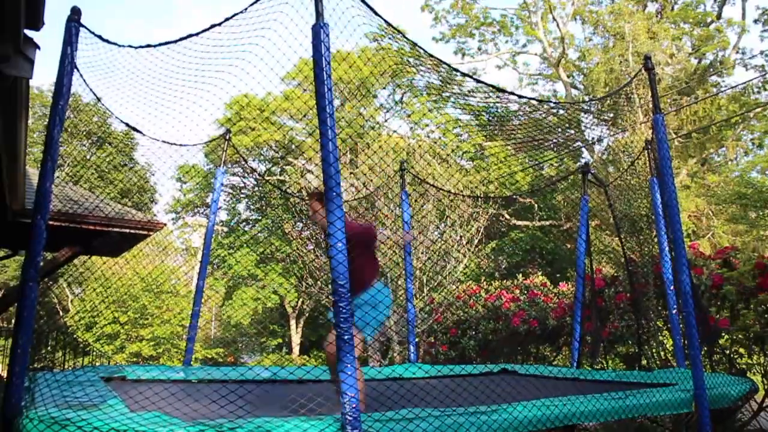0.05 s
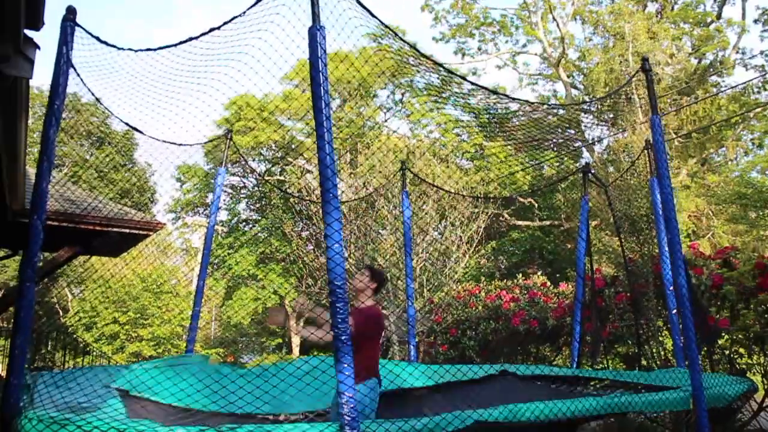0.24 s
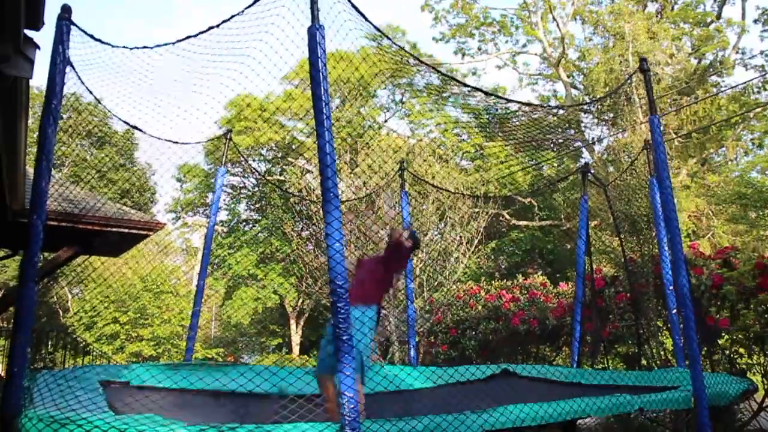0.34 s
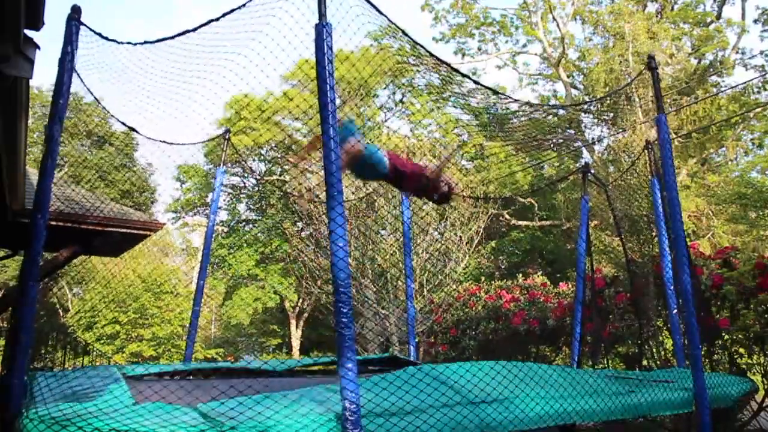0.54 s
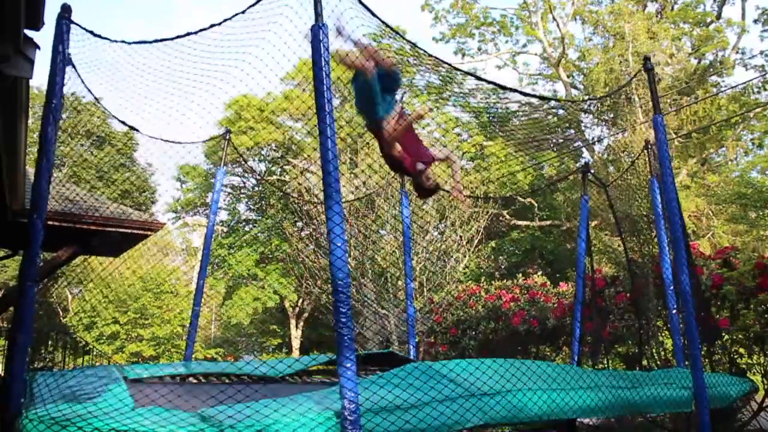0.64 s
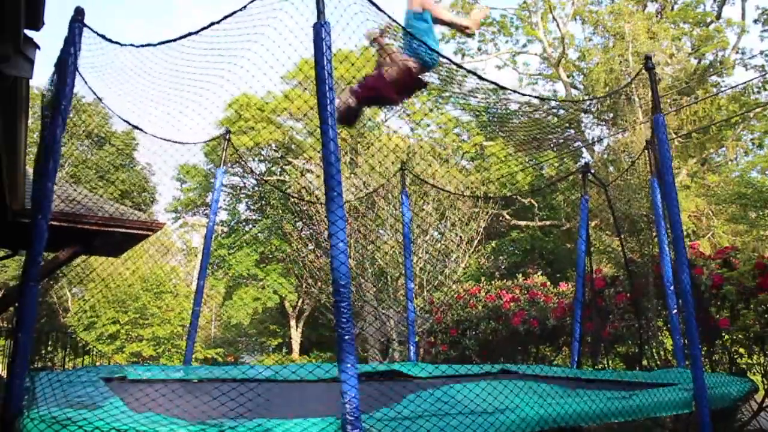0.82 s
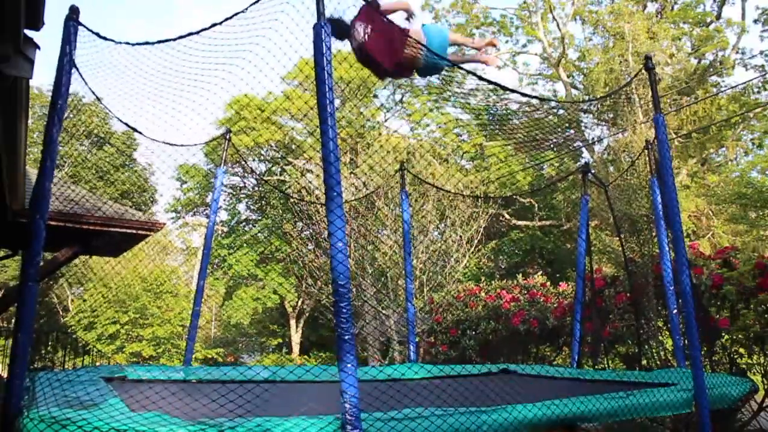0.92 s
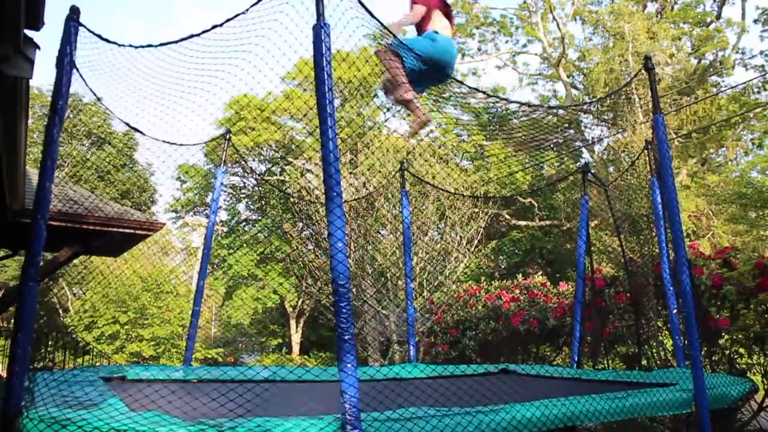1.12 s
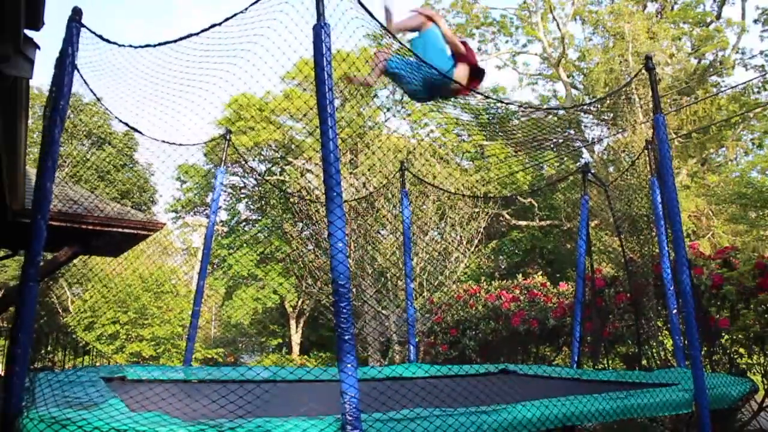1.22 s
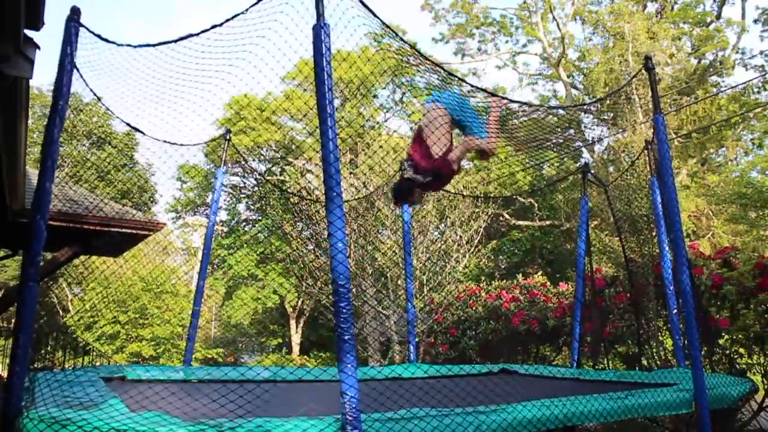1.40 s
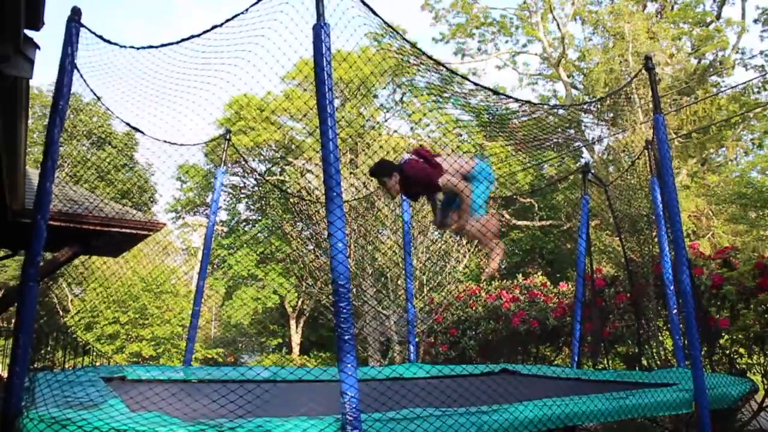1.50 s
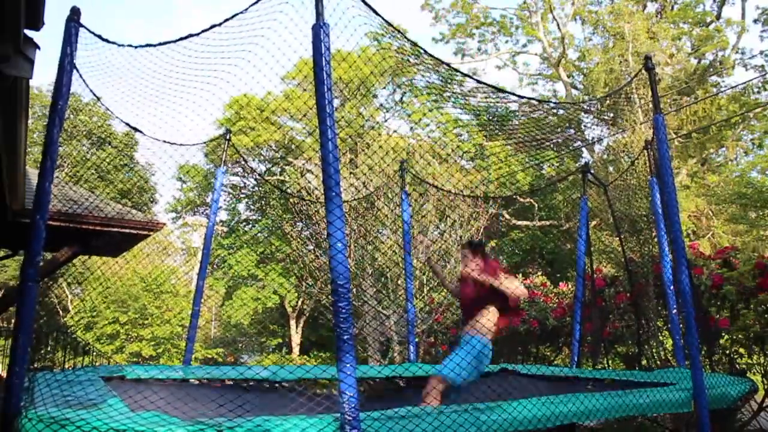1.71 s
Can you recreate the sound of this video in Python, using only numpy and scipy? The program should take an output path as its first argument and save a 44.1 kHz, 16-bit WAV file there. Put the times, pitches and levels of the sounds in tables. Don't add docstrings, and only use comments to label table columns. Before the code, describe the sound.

Trampoline bounce heard from a few metres in a quiet garden: feet land softly, springs jangle, pads flap hard in clustered thumps, looser knocks follow, then near silence with faint hiss before another soft landing.

```python
import sys
import numpy as np
from scipy import signal
from scipy.fft import rfft, irfft, next_fast_len
from scipy.io import wavfile
from scipy.ndimage import uniform_filter1d

SR = 44100
rng = np.random.default_rng(int(sys.argv[2]) if len(sys.argv) > 2 else 0)


def boost(x):
    u = np.asarray(x, float) / 20
    return 10 ** u


def wav_record(signal):
    frames = np.transpose(np.atleast_2d(signal))
    bounded = np.clip(frames, -1, 1)
    quanta = np.round(bounded * 32767).astype(np.int16)
    wavfile.write(sys.argv[1], SR, quanta)


N = 77175


def colour(x, points):
    size = next_fast_len(N + 4096)
    hz = np.arange(2049) * SR / 4096 + 1e-3
    p = np.array(points, float)
    log_gain = np.interp(np.log(hz), np.log(p[:, 0]), p[:, 1]) * np.log(10) / 20
    cepstrum = irfft(log_gain)
    cepstrum[1:2048] *= 2
    cepstrum[2049:] = 0
    response = irfft(np.exp(rfft(cepstrum)))
    return irfft(rfft(x, size) * rfft(response, size), size)[..., :N]


def unit(x):
    return x / np.sqrt(np.mean(x ** 2))


def ring(x, hz, width):
    return signal.lfilter(*signal.iirpeak(hz, hz / width, fs=SR), x)


def resonances(x, table):
    return sum((-1) ** k * boost(db) * ring(x, hz, width) for k, (hz, width, db) in enumerate(table))


def shaken(bursts, per_s, spread_db, body):
    t = np.arange(N) / SR
    power = 0
    for peak_s, db, rise_s, fall_s in bursts:
        away = np.where(t < peak_s, (peak_s - t) / abs(rise_s), (t - peak_s) / abs(fall_s))
        power = power + boost(db - 20 * away) ** 2
    chance, direction, size = rng.random((3, 2, N))
    knocks = (chance < per_s / SR) * np.sign(direction - .5) * boost(-spread_db * np.log(size + .004))
    return body(knocks * np.sqrt(power)) / np.sqrt(np.mean(body(knocks) ** 2))


def struck(modes, contact_s):
    out = np.zeros(N + SR)
    t = np.arange(SR // 2) / SR
    for k, (start_s, hz, db, t60) in enumerate(modes):
        i = int(start_s * SR)
        onset = 1 - np.exp(-t / contact_s)
        out[i:i + len(t)] += (-1) ** k * boost(db - 60 * t / t60) * np.sin(2 * np.pi * hz * t) * onset
    return out[:N] * np.array([[1], [0]])


# peak_s, level_db (rms), rise_s, fall_s
THUDS = [(.135, -52, 0.012, 0.091), (.265, -38, 0.15, 0.3), (.36, -28.5, 0.063, 0.057),
         (.392, -29, 0.04, 0.03), (.457, -26.5, 0.019, 0.064), (.52, -39.5, 0.031, 0.28),
         (.68, -52, 0.067, .1), (.8, -39.5, 0.064, 0.17), (.875, -34.5, 0.043, 0.032),
         (.946, -42, 0.025, 0.044), (1.005, -34.5, 0.13, 0.081), (1.08, -44, 0.029, 0.015),
         (1.74, -35, 0.018, .05)]
# pitch_hz, width_hz, level_db
PAD = [(142.7, 72, -0.5), (200, 69, 0.5), (281.5, 76, -2.5), (400, 224, -4.5), (546, 252, -6.5)]


def pad_thuds():
    return shaken(THUDS, 2500, 2.2, lambda x: resonances(x, PAD))


# start_s, pitch_hz, peak_db, fade_60db_s
KNOCKS = [(.348, 185, -14, 0.07), (0.3788, 143, -13, 0.068), (0.385, 190, -16, 0.04),
          (0.5087, 219, -22, 0.088), (0.8027, 233, -21, 0.03), (0.857, 225, -25.5, 0.08),
          (0.8653, 232.3, -22, 0.076), (0.878, 200, -30, 0.05), (.99, 176, -24, 0.12),
          (1.0015, 176, -22, 0.1), (1.7193, 121, -26, 0.044), (1.732, 128, -29, 0.064)]
# multiple of its pitch, level_db
PAD_MODES = [(1, -0.5), (1.55, -9), (2.3, -8), (3.8, -10), (5.5, -14)]


def pad_knocks():
    modes = []
    for start_s, hz, db, t60 in KNOCKS:
        for multiple, overtone_db in PAD_MODES:
            modes.append((start_s, multiple * hz, db + overtone_db, t60 / np.sqrt(multiple)))
    return struck(modes, contact_s=0.0022)


# peak_s, level_db (rms), rise_s, fall_s
SLAPS = [(.14, -45.5, 0.034, 0.16), (.21, -25.5, 0.0041, 0.086), (.245, -27.5, 0.074, 0.14),
         (.354, -24, 0.033, 0.068), (.385, -20.5, 0.035, 0.099), (.404, -17, 0.028, 0.036),
         (.462, -26, 0.024, 0.11), (.505, -32, 0.11, 0.13), (.7, -33.5, 0.14, 0.16),
         (.803, -35, 0.029, .04), (.87, -36.5, 0.058, 0.072), (.96, -31.5, 0.054, 0.068),
         (1.008, -29, 0.061, 0.05), (1.08, -41.5, 0.099, 0.099), (1.722, -43, 0.0049, .1),
         (1.745, -46, .02, .05)]
# pitch_hz, width_hz, level_db
VINYL = [(827, 154, -1.5), (1030, 156, -1.5), (1298, 183, 0.5), (1564, 357, -1.5), (2043, 1030, -9.5),
         (556, 334, -7.5)]


def vinyl_slaps():
    return shaken(SLAPS, 6000, 2.2, lambda x: resonances(x, VINYL))


# peak_s, level_db (rms), rise_s, fall_s
HEAVES = [
    (.125, -43, 0.024, 0.04),
    (.3, -43, 0.087, 0.072),
    (.41, -40, .1, 0.16),
    (1.0, -48, 0.055, 0.093),
    (1.73, -43, 0.018, .1),
]
# pitch_hz, width_hz, level_db
MAT = [(30, 27, 3), (59, 25, 5), (99, 36, -3.5)]


def mat_heaves():
    return shaken(HEAVES, 2500, 2.2, lambda x: resonances(x, MAT))


# start_s, pitch_hz, peak_db, fade_60db_s
FEET = [(.119, 140, -27, .14), (.121, 307, -29, .14), (.12, 470, -32, .12), (.122, 760, -36, 0.088),
        (1.7195, 190, -30, .05), (.348, 330, -20, .05), (.381, 380, -17, .05), (.866, 480, -33, .05),
        (1.7195, 270, -32, 0.036), (1.731, 287, -37, 0.046), (.858, 155, -29, .08), (.866, 296, -28, 0.037),
        (.801, 164, -30, .06)]


def feet_on_mat():
    return -struck(FEET, contact_s=0.0014)


# peak_s, level_db (rms), rise_s, fall_s
RATTLES = [(.121, -55.5, .004, 0.36), (.198, -41, 0.022, 0.036), (.222, -29.5, 0.018, 0.15),
           (.36, -35.5, 0.089, .08), (.403, -26.5, 0.047, 0.05), (.458, -31.5, 0.034, 0.11),
           (.553, -34, 0.0046, 0.062), (.67, -42.5, 0.099, 0.04), (.705, -39, 0.037, 0.054),
           (.758, -40.5, 0.01, 0.053), (.803, -41.5, 0.015, 0.046), (.872, -40.5, 0.046, 0.067),
           (.95, -43.5, 0.013, 0.09), (1.008, -43, 0.052, 0.063), (1.074, -40.5, 0.015, 0.042),
           (1.12, -59.5, .05, 0.53), (1.292, -54, 0.0058, 0.058), (1.622, -55.5, 0.03, .06),
           (1.722, -50, 0.0065, 0.12)]
# pitch_hz, level_db
COILS = [(1500, -11.5), (2300, -1.5), (3600, 1), (5000, -4.5), (7000, -8.5), (10000, -10), (12000, -17.5),
         (16000, -24)]


def spring_rattles():
    return shaken(RATTLES, 14000, 2.4, lambda x: colour(x, COILS))


# start_s, pitch_hz, width_hz, level_db (rms), fall_s
RINGS = [(.225, 1015, 303, -37, 0.057), (0.214, 3240, 500, -34, 0.023), (.235, 3720, 100, -42, 0.083),
         (.26, 2286, 300, -32.5, 0.052), (0.451, 4820, 300, -40.5, 0.049), (.552, 3960, 304, -50, 0.089),
         (.552, 5280, 400, -42.5, 0.054), (.669, 3700, 200, -40.5, 0.09), (.72, 5000, 300, -44.5, 0.032),
         (.758, 7870, 150, -59, 0.084), (1.08, 5210, 300, -51, 0.039), (1.07, 3800, 300, -54, 0.061),
         (1.289, 3030, 900, -58, 0.054)]


def chattering_parts():
    out = 0
    for start_s, hz, width, db, fall_s in RINGS:
        burst = [(start_s, db, .003, fall_s)]
        out = out + shaken(burst, 14000, 1, lambda x: ring(ring(x, hz, width), hz, width))
    first_blows = [(start_s, hz, db + 3.5, 2 * fall_s) for start_s, hz, _, db, fall_s in RINGS]
    return out + struck(first_blows, contact_s=0.0022)


# start_s, pitch_hz, peak_db, fade_60db_s
PINGS = [(.394, 1060, -10.5, 0.096), (.399, 1090, -9, 0.039), (.399, 550, -12, .08), (.399, 320, -14, .07),
         (.403, 1357, -17, 0.047), (.407, 720, -12, .07), (.414, 1060, -17, 0.087), (.382, 1800, -21, .05),
         (0.29, 1200, -25, 0.047), (.212, 1100, -23.5, 0.1), (.23, 930, -28.5, .15), (.268, 360, -30, 0.11),
         (.455, 5650, -39, .1), (0.51, 2557, -33, .09), (.462, 1600, -27, 0.07), (.465, 3688, -35.5, .12),
         (0.42, 2900, -36, 0.28), (.485, 2200, -37, 0.1), (.556, 3935, -35, 0.13), (.553, 3661, -41, 0.22),
         (.553, 6600, -40, 0.083), (.556, 7900, -42, .08), (1.1, 2500, -45, 0.094), (.993, 1320, -29, 0.11),
         (1.005, 970, -37, 0.12), (1.004, 1400, -35, 0.064), (1.07, 4000, -42, 0.074),
         (1.082, 6300, -41, .12), (1.074, 2200, -38, .07), (1.08, 2950, -41, .08),
         (1.068, 5400, -42.5, .06), (1.072, 2100, -38, .08), (.945, 187, -31, .07),
         (1.075, 186, -37, 0.082), (1, 450, -33.5, 0.1)]


def spring_pings():
    return struck(PINGS, contact_s=0.0014)


# pitch_hz, peak_db, fade_60db_s
CLANK = [(745, -25.5, 0.09), (946, -20, 0.12), (1216, -19.5, 0.062), (1510, -32, 0.088)]


def leg_clank():
    start_s = .2063
    return struck([(start_s, *mode) for mode in CLANK], contact_s=.0003)


# start_s, peak_db
TICKS = [
    (1.2766, -44),
    (1.2875, -29.5),
    (1.2965, -48),
]
# pitch_hz, level_db, fade_60db_s
HOOK = [(2810, -0.5, 0.0095), (3920, -3, 0.0041), (5600, -14, .004), (6750, -7, .004), (8500, -3, 0.0044),
        (9760, 2, 0.0062), (11900, 0, .004), (14500, -6, .003), (3280, -8, 0.0053)]


def hook_ticks():
    modes = [(start_s, hz, db + note_db, t60) for start_s, db in TICKS for hz, note_db, t60 in HOOK]
    return struck(modes, contact_s=0.00027)


def trampoline():
    soft_parts = pad_thuds() + pad_knocks() + vinyl_slaps() + mat_heaves() + feet_on_mat()
    steel_parts = spring_rattles() + chattering_parts() + spring_pings() + leg_clank() + hook_ticks()
    return soft_parts + steel_parts


def echo(near):
    t60_s, level_db, first_return_s = 0.19, -15, .008
    t = np.arange(SR // 3) / SR
    tail = rng.standard_normal((2, len(t))) * boost(-60 * t / t60_s) * (t > first_return_s)
    tail = unit(tail) / np.sqrt(len(t))
    return boost(level_db) * signal.fftconvolve(near[:1], tail, axes=1)[:, :N]


# pitch_hz, level_db (per Hz)
AIR = [(25, -23), (55, 1), (150, -11.5), (400, -12), (1000, -10.5), (1630, -13.5), (2400, -24),
       (11000, -57.5)]
# pitch_hz, width_hz, level_db (rms)
HUM = [(111.7, 6.9, -59), (215.1, 4.7, -57), (272, 5.5, -62.5)]


def garden():
    air_db, sway_db = -52, 1.0
    noise = rng.standard_normal((2, N))
    hum = sum(boost(db) * unit(ring(noise, hz, width)) for hz, width, db in HUM)
    steps = np.repeat(rng.standard_normal(N // 4000 + 1), 4000)
    sway = uniform_filter1d(steps, 4000)[:N]
    return boost(air_db + sway_db * sway) * unit(colour(noise, AIR)) + hum


# pitch_hz, level_db (side over mid)
WIDTH = [(40, -9), (200, -18), (700, -14.5), (1400, -11), (3000, -6.5), (7000, -10), (9500, -3),
         (15000, 6.5)]
# pitch_hz, level_db (left over right)
LEAN = [(60, 4), (110, -0.5), (200, 3), (380, 1.5), (700, 1.5), (1290, -2), (2380, -1.5), (4400, 0),
        (8120, 3), (15000, 7)]


def scene():
    near = trampoline()
    mid, side = near + echo(near) + garden()
    side = colour(side, WIDTH)
    lean = np.array(LEAN, float)
    left = colour(mid, lean * [1, .5]) + side
    right = colour(mid, lean * [1, -.5]) - side
    return np.array([left, right])


# pitch_hz, level_db
MID_EDGE = [(10900, 1), (11250, -14), (11500, -1.5), (16000, -5)]


def dulled_top(mid):
    return colour(mid, MID_EDGE)


# pitch_hz, level_db
HISS = [(2000, -1), (9000, -7.5), (11050, -10.5), (11250, -20), (11450, -5.5), (16000, -4)]


def capsule_hiss(shape):
    return boost(-59.5) * unit(colour(rng.standard_normal(shape), HISS))


def starved(mid):
    starved_hz, loud_db, kept_share = 11700, -49, .33
    hz, t, z = signal.stft(mid, SR, nperseg=2048, noverlap=1024)
    loudness = np.sqrt(uniform_filter1d(ring(mid, 2000, 2000) ** 2, 3000))
    loud = loudness[np.minimum((t * SR).astype(int), N - 1)] > boost(loud_db)
    chosen = rng.random((33, len(t) // 2 + 1)) < kept_share
    kept = np.kron(chosen, np.ones((32, 2)))[:len(hz), :len(t)]
    z = np.where((hz[:, None] > starved_hz) & loud, z * kept, z)
    return signal.istft(z, SR, nperseg=2048, noverlap=1024)[1][:N]


def low_pass(x):
    return signal.sosfilt(signal.butter(12, 16030, fs=SR, output="sos"), x)


def record(dry):
    mid = dulled_top((dry[0] + dry[1]) / 2)
    side = (dry[0] - dry[1]) / 2
    hiss = capsule_hiss(dry.shape)
    mid = starved(mid + (hiss[0] + hiss[1]) / 2)
    side = side + (hiss[0] - hiss[1]) / 2
    return low_pass(np.array([mid + side, mid - side]))


dry = scene()
out = record(dry)
wav_record(out)
```